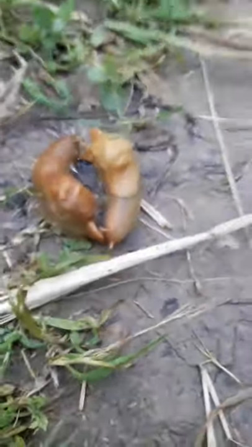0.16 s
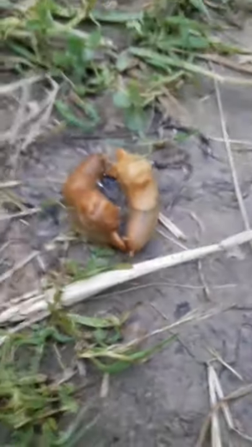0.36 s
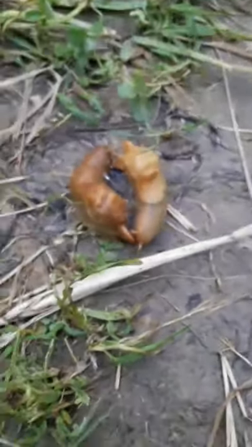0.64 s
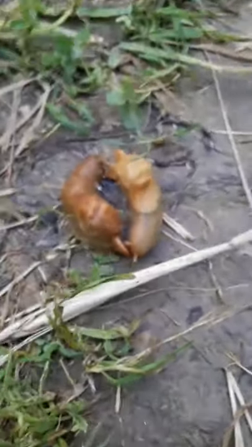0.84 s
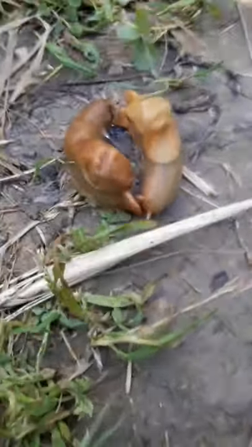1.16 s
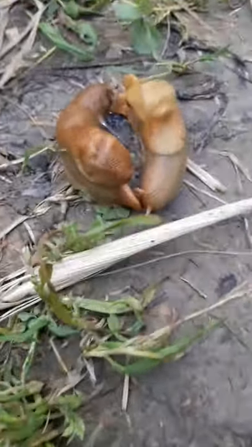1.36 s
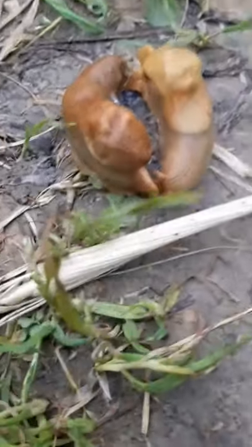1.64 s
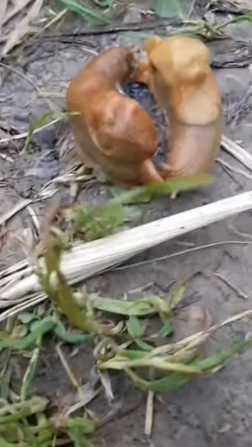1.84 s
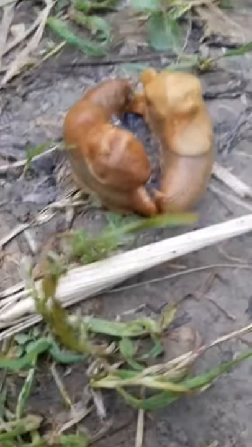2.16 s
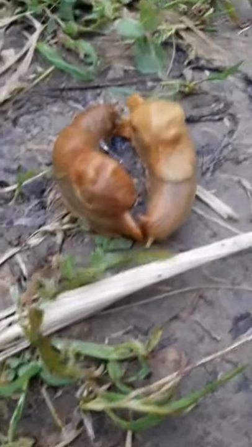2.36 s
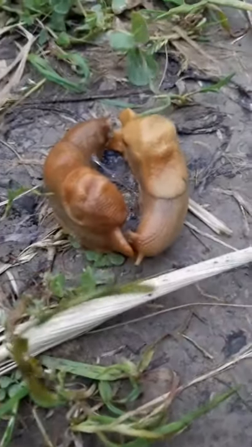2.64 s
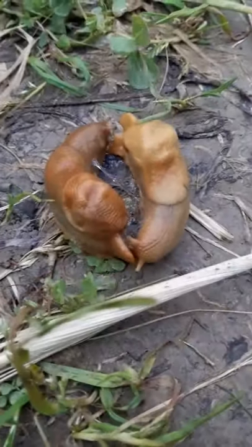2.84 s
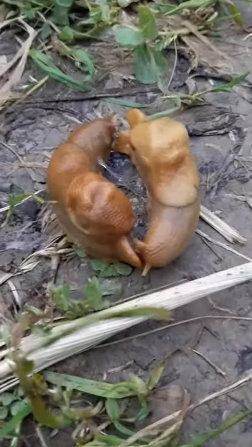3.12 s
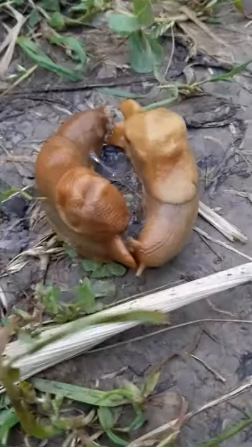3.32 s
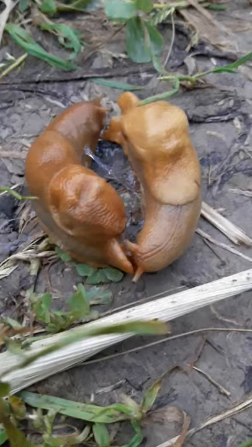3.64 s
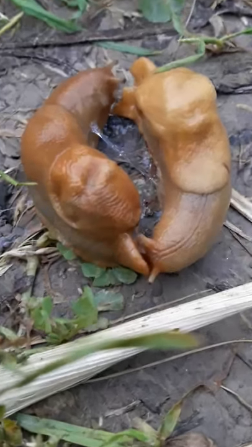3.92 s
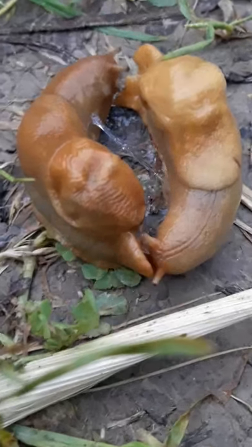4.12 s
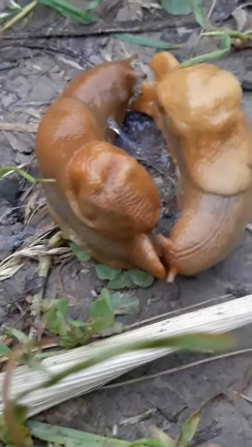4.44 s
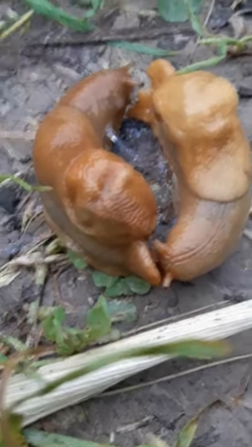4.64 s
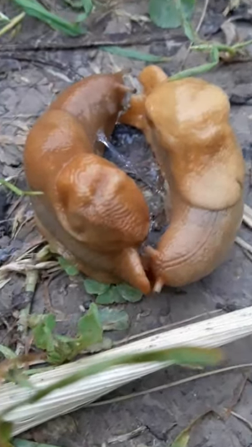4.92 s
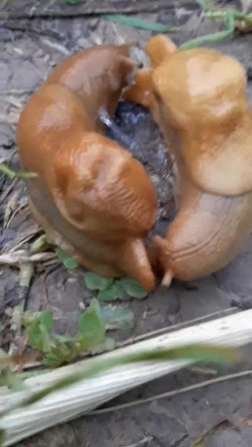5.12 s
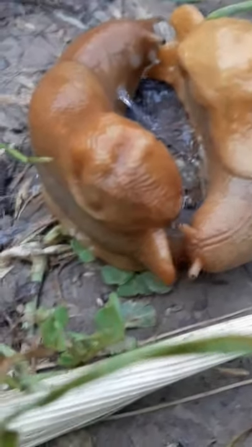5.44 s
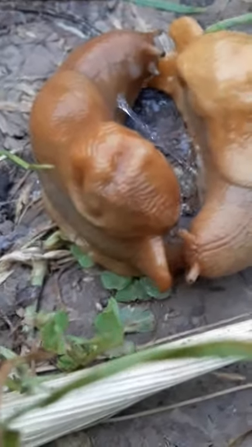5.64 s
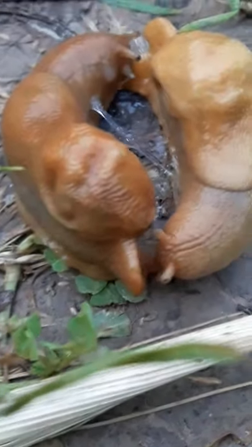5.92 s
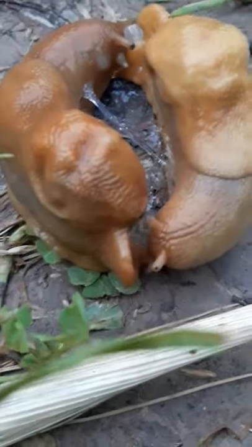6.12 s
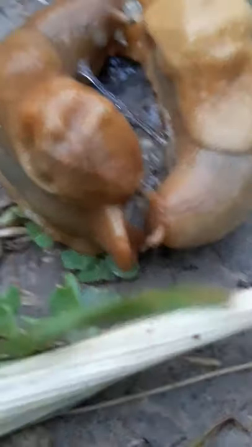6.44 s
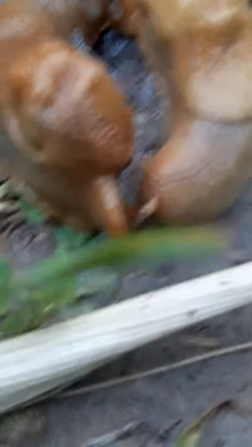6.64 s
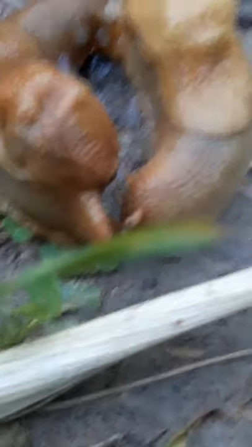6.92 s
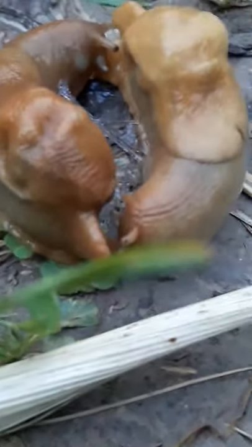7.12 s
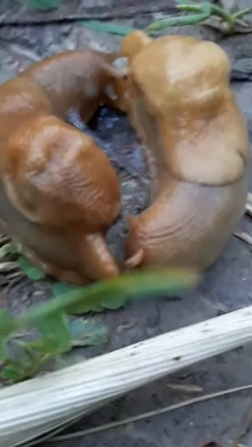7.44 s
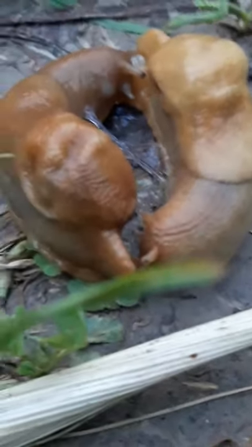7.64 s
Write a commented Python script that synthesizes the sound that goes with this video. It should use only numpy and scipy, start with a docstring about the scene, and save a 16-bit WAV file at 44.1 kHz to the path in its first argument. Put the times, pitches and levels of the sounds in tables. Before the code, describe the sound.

A dense flock of small birds chatters and whistles outdoors over the low wavering drone of two motors, with brief rustles near the microphone.

```python
"""A large flock of small birds chatters over two droning motors, with faint hiss and a few low far calls.
The flock is hundreds of short bent tones per tree plus a noise wash; the motors are wavering tones and rumble.
Whistles (slurs, chirps, peeps) stand out throughout as gliding tones; one dry tick, a windowed sine, snaps
near the start; rasps, tones of fast-shaken pitch, recur. Grainy noise bursts make rustles and dull shuffles.
From midway, thin calls plunge in pitch. Random decaying tails blur all the birds as foliage does."""
import sys
import numpy as np
from scipy import signal
from scipy.fft import rfft, irfft, next_fast_len
from scipy.io import wavfile
from scipy.ndimage import map_coordinates

SR = 44100
rng = np.random.default_rng(int(sys.argv[2]) if len(sys.argv) > 2 else 0)


def wav_out(sig):
    """Save sig, one row per channel (or a flat mono array), as 16-bit PCM at SR to the path in sys.argv[1]."""
    wavfile.write(sys.argv[1], SR, np.round(np.clip(np.atleast_2d(sig).T, -1, 1) * 32767).astype(np.int16))


N = 343098


def amp(db):
    """Amplitude factor of a level in dB."""
    return 10 ** (np.asarray(db) / 20)


def unit(x):
    """x scaled to rms 1."""
    return x / np.sqrt(np.mean(x ** 2) + 1e-20)


def along(points, hz):
    """Interpolate (frequency [Hz], value) points on a log frequency axis."""
    point_hz, values = np.transpose(points)
    return np.interp(np.log(hz + 1), np.log(point_hz + 1), values)


def curves(rows):
    """One value per sample for each column after the time."""
    time_s, *columns = np.transpose(rows)
    return [np.interp(np.arange(N) / SR, time_s, column) for column in columns]


def wobble(rate_hz, size):
    """Smooth random curve with rate_hz knots a second."""
    knots = rng.standard_normal(int(size * rate_hz / SR) + 4)
    return map_coordinates(knots, [np.arange(size) * rate_hz / SR])


def filtered(x, response):
    """x times a response of frequency."""
    m = next_fast_len(N + SR // 4)
    spectrum = rfft(x, m) * response(np.fft.rfftfreq(m, 1 / SR))
    return irfft(spectrum, m)[..., :N]


def noise(spectrum):
    """Noise of rms 1 with the given colour."""
    return unit(filtered(rng.standard_normal(N), lambda hz: amp(along(spectrum, hz))))


def add(track, start_s, sound):
    """Mix a sound into the track at start_s."""
    part = track[max(int(start_s * SR), 0):][:len(sound)]
    part += sound[:len(part)]


def swell(length_s):
    """Rounded rise and fall."""
    return np.sqrt(np.abs(np.sin(np.linspace(0, np.pi, max(int(length_s * SR), 16)))))


def note(length_s, start_hz, middle_hz, end_hz, rough, overtone_db=-37, warble=1):
    """Nearly pure tone bending through three pitches, times a warble, trembling by the share rough."""
    shape = swell(length_s)
    u = np.linspace(0, 1, len(shape))
    # parabola through the three pitches
    hz = start_hz * (1 - u) * (1 - 2 * u) + middle_hz * 4 * u * (1 - u) + end_hz * u * (2 * u - 1)
    knots = rng.standard_normal(len(shape) // 64 + 2)
    tremble = np.interp(u, np.linspace(0, 1, len(knots)), knots)
    phase = 2 * np.pi * np.cumsum(hz * warble * (1 + rough * tremble)) / SR
    return shape * (np.sin(phase) + amp(overtone_db) * np.sin(2 * phase))


def foliage(sound, wet_db, t60_s):
    """Leaves and trunks scatter a sound into a short decaying tail, drawn anew each time."""
    t = np.arange(SR // 3) / SR
    tail = rng.standard_normal(len(t)) * amp(-60 * t / t60_s)
    path = amp(wet_db) * tail / np.linalg.norm(tail)
    path[0] += 1  # direct sound
    return signal.fftconvolve(sound, path / np.linalg.norm(path))


def glides(rows, oct_per_s, bend_oct, steepens=0, reference_hz=2434):
    """Calls slide at the rate of their kind, so longer ones sweep farther; steepens is the power of pitch."""
    calls = []
    for start_s, length_s, hz, db in rows:
        half_oct = oct_per_s * (hz / reference_hz) ** steepens * length_s / 2
        start_hz = hz * 2 ** (bend_oct - half_oct)
        end_hz = hz * 2 ** (bend_oct + half_oct)
        calls.append((start_s, length_s, start_hz, hz, end_hz, db))
    return calls


def bird_calls(calls, gain_db, wet_db, t60_s, flutter_db, warble_share):
    """Single calls, each with an unsteady pitch and a flutter that breaks it into beads."""
    out = np.zeros(N)
    for start_s, length_s, start_hz, middle_hz, end_hz, db in calls:
        size = len(swell(length_s))
        warble = 1 + warble_share * wobble(110, size)
        tone = note(length_s, start_hz, middle_hz, end_hz, rough=.02, overtone_db=-33, warble=warble)
        flutter = unit(amp(flutter_db * np.tanh(wobble(141.6, size))))
        add(out, start_s, amp(db + gain_db) * foliage(tone * flutter, wet_db, t60_s))
    return out


def rubs(rows, spectrum, grain_db):
    """Short bursts of friction: coloured noise with a fast random grain."""
    force = np.zeros(N)
    for start_s, length_s, db in rows:
        add(force, start_s, amp(db) * swell(length_s))
    return force * unit(noise(spectrum) * amp(grain_db * wobble(157, N)))


def tree(count, spread_db=2, typical_s=.036, slide=0.0496, fall=0.018):
    """One tree full of birds: short hoarse notes at many pitches, a few more falling than rising."""
    out = np.zeros(N)
    places = rng.random((count, 2))
    shapes = rng.standard_normal((count, 4))
    for (when, pitch), (long, tilt, arch, loud) in zip(places, shapes):
        hz = 600 * (7600 / 600) ** (pitch ** .8)
        bend = np.exp(fall + slide * tilt)
        middle_hz = hz * np.exp(0.04046 * arch)
        chirp = note(typical_s * np.exp(.3 * long), hz * bend, middle_hz, hz / bend, rough=0.022)
        add(out, when * N / SR, amp(spread_db * min(loud, 1)) * chirp)
    return foliage(out, wet_db=1.5, t60_s=0.35)[:N]


def flock(trees=8, wash_db=-3, swell_db=.5, swell_rate_hz=7):
    """Trees of chirps over a noise wash of merged birds; three voice ranges follow the flock's loudness."""
    # flock loudness, used about its mean: (time [s], relative level [dB])
    loudness_rows = [(0.0, -46.5), (0.18, -54.5), (.9, -51), (1.22, -49.5), (1.32, -55), (1.5, -53),
                     (1.88, -52), (2.45, -56), (3.0, -54.5), (3.55, -51.5), (4.15, -47.5), (4.62, -48.5),
                     (5.37, -50), (6.02, -49.5), (6.62, -47), (6.92, -50.5), (7.09, -47), (7.78, -47.5)]
    # colour of the flock as a whole: (frequency [Hz], relative level [dB])
    chatter = [(240, -63), (400, -29.5), (533, -19.5), (728, -20.5), (874, -18.5), (1090, -17),
               (1910, -8.5), (2320, 1), (3130, -0.5), (3760, -2), (4340, -6.5), (5860, -6.5), (7030, -19),
               (8320, -36.5), (9000, -72), (11700, -74), (19800, -120)]
    chirps = sum(tree(count=380) for _ in range(trees))
    chirps = unit(filtered(chirps, lambda hz: amp(along(chatter, hz)) * (hz / 3000) ** 0.59))
    chorus = chirps + amp(wash_db) * noise(chatter)
    loudness_db, = curves(loudness_rows)
    surge_db = loudness_db - loudness_db.mean()

    def above(hz, edge_hz):
        return 1 / (1 + (edge_hz / (hz + 1)) ** 20)

    # (mean level [dB], share of the surge followed, band response)
    voices = [(-57, 0.43, lambda hz: 1 - above(hz, 2086)),
              (-51, 0.96, lambda hz: above(hz, 2138) - above(hz, 4337)),
              (-59, 0.74, lambda hz: above(hz, 4380))]
    out = np.zeros(N)
    for db, follows, band in voices:
        level_db = db + follows * surge_db + swell_db * wobble(swell_rate_hz, N)
        out += amp(level_db) * unit(filtered(chorus, band))
    return out


def drone(hz, db, waver_hz, fade_db):
    """One motor tone that wavers in pitch and fades a little at random."""
    phase = 2 * np.pi * np.cumsum(hz + waver_hz * wobble(25, N)) / SR
    return amp(db) * unit(np.sin(phase) * amp(fade_db * np.tanh(wobble(16, N))))


def engines(drone_db=-1, hum_db=-1, rumble_db=2, road_follows=0.12):
    """A deep motor, and a vehicle whose rising harmonics pass an exhaust resonance over dull road rumble."""
    # drone of the deep motor: (time [s], relative level [dB])
    motor = [(0, -70), (1.8, -68), (2.05, -63), (2.5, -68.5), (2.95, -67.5), (3.65, -62.5), (3.88, -70),
             (4.25, -60.5), (4.65, -61.5), (5.2, -67), (5.5, -62.5), (5.93, -67.5), (6.1, -61), (7.0, -62),
             (7.25, -69), (7.78, -63.5)]
    # vehicle: (time [s], firing rate [Hz], relative hum level [dB])
    traffic = [(0, 40, -80.5), (2.3, 41.52, -71.5), (2.85, 41.4, -66), (3.9, 46.35, -66.5),
               (4.6, 48.37, -66.5), (5.3, 52.42, -69), (7.78, 61.9, -73.5)]
    # colour of the road rumble before shaping: (frequency [Hz], relative level [dB])
    rumble = [(15, -39), (25, -11.5), (38, -14.5), (59, -7), (71, -11), (102, -3.5), (177, -11),
              (321, -12.5), (397, -21.5), (600, -39), (780, -37), (1320, -120)]
    exhaust_hz, exhaust_width_hz = 170, 19.8

    def boom(hz):
        return 1 / np.hypot(1, (hz - exhaust_hz) / exhaust_width_hz)

    firing_hz = 70.8 + .6 * np.arange(N) / SR  # slowly gains speed
    deep = drone(firing_hz, curves(motor)[0], waver_hz=2.7, fade_db=5.5)
    road_hz, road_db = curves(traffic)
    hum = sum(boom(k * road_hz) * drone(k * road_hz, road_db, waver_hz=3.2, fade_db=6)
              for k in range(2, 8))
    shaping = [(22, -24), (45, -1.5), (73, -20), (95, -4.0)]  # (frequency [Hz], gain [dB])
    dull = unit(filtered(noise(rumble), lambda hz: amp(along(shaping, hz))))
    mean_db = road_db.mean()
    dull_db = rumble_db + mean_db + road_follows * (road_db - mean_db)
    return amp(drone_db) * deep + amp(hum_db) * hum + amp(dull_db) * dull


def hiss(mid_db=-76.5, side_db=-81.0):
    """Faint coloured noise: one part common to both sides, one in opposite polarity."""
    # (frequency [Hz], relative level [dB])
    colour = [(300, 7.5), (1000, 2), (6000, -56), (8500, -7.5), (11200, -2), (12500, -2), (15300, 2)]
    return amp(mid_db) * noise(colour) + amp(side_db) * noise(colour) * np.array([[1], [-1]])


def low_calls():
    """Low calls from far off: drooping tones with deep flutter and a long scattered tail."""
    # (time [s], length [s], middle pitch [Hz], relative level [dB])
    rows = [(0, 0.16, 792, -57.5), (1.08, 0.14, 773, -62), (5.37, 0.11, 1507, -52),
            (7.1, 0.177, 910, -58.5), (7.3, 0.12, 890, -56)]
    calls = glides(rows, oct_per_s=-0.65, bend_oct=-0.0091)
    return bird_calls(calls, gain_db=-1.0, wet_db=0.0, t60_s=0.87, flutter_db=13.5, warble_share=0.0069)


def whistles():
    """Near whistles: slurs fall and flatten out, chirps rise and arch over, peeps sag slightly."""
    # falling slurs, the commonest: (time [s], length [s], middle pitch [Hz], relative level [dB])
    slurs = [(0.074, 0.091, 2250, -51.5), (0.39, 0.072, 2415, -51.5), (0.41, 0.056, 2020, -49),
             (0.841, 0.05, 1856, -47.5), (1.111, 0.025, 3490, -44.0), (1.449, 0.062, 2140, -48),
             (1.535, 0.052, 1747, -53.5), (1.943, 0.041, 2766, -42.5), (2.006, 0.033, 3280, -47),
             (2.089, 0.071, 2420, -49), (2.595, 0.08, 2450, -49), (3.204, 0.062, 2040, -52.5),
             (3.335, 0.05, 1810, -52), (3.385, 0.061, 2360, -47.5), (3.876, 0.053, 2347, -48.5),
             (3.904, 0.044, 3680, -44), (3.936, 0.062, 2880, -48), (4.01, 0.048, 2300, -52),
             (4.38, 0.057, 2280, -51), (4.692, 0.03, 3180, -46), (5.12, 0.087, 3480, -46),
             (5.215, 0.072, 2370, -44.5), (5.779, 0.031, 2890, -46.5), (6.285, 0.065, 2406, -44),
             (7.024, 0.033, 3740, -43.5), (7.304, 0.043, 2920, -40.5), (7.523, 0.046, 3060, -42)]
    # rising chirps: (time [s], length [s], middle pitch [Hz], relative level [dB])
    chirps = [(0.186, 0.076, 6290, -49), (0.254, 0.07, 3960, -53), (0.621, 0.059, 5660, -44.5),
              (0.986, 0.06, 5500, -48), (1.075, 0.046, 5930, -49.5), (1.069, 0.049, 4140, -50),
              (1.376, 0.04, 3780, -46), (1.674, 0.09, 2970, -50), (2.206, 0.05, 4080, -48.5),
              (3.307, 0.05, 3380, -51.5), (3.399, 0.07, 3480, -50), (3.591, 0.09, 3540, -47),
              (4.365, 0.09, 3550, -46), (5.39, .05, 3190, -53), (5.785, 0.045, 3230, -45),
              (7.05, .03, 3080, -45), (7.256, 0.045, 2976, -45.5), (7.416, 0.055, 3130, -44)]
    # nearly level peeps: (time [s], length [s], middle pitch [Hz], relative level [dB])
    peeps = [(0.33, 0.066, 2100, -54), (0.61, 0.029, 5460, -45), (0.622, 0.07, 2050, -49),
             (1.231, 0.037, 4080, -46), (1.425, 0.048, 3350, -41.5), (1.771, 0.073, 5640, -48),
             (2.735, 0.11, 2475, -50.5), (3.103, 0.057, 4010, -49.5), (3.994, 0.035, 2780, -48),
             (4.454, 0.072, 2700, -49), (4.85, 0.088, 3200, -45), (5.046, 0.075, 2294, -45.5),
             (5.471, 0.058, 2414, -53), (5.82, 0.058, 2310, -49), (6.36, 0.19, 2348, -49),
             (6.523, 0.075, 5900, -49), (6.56, .07, 2864, -44), (7.105, 0.058, 3160, -42)]
    calls = glides(slurs, oct_per_s=-5.0, bend_oct=0.0563, steepens=0.62)  # higher slurs fall faster
    calls += glides(chirps, oct_per_s=1.89, bend_oct=-0.0407)
    calls += glides(peeps, oct_per_s=-0.38, bend_oct=-0.022)
    return bird_calls(calls, gain_db=.8, wet_db=-6, t60_s=.16, flutter_db=5, warble_share=.014)


def tick(time_s=.0777, hz=5200, width_s=.00013, db=-27.5):
    """One tiny dry snap close to the microphone: a sine in a bell window a few cycles wide."""
    t = np.arange(N) / SR - time_s
    return amp(db) * np.exp(-.5 * (t / width_s) ** 2) * np.sin(2 * np.pi * hz * t)


def rasps(gain_db=-2):
    """Scolding birds: the pitch shakes so fast that the call turns to a rasp."""
    # (time [s], length [s], centre pitch [Hz], pitch shake [Hz], relative level [dB])
    rows = [(0.337, 0.057, 5700, 332, -46.5), (0.678, 0.032, 4870, 550, -46),
            (0.776, 0.043, 4600, 810, -45), (0.998, 0.2, 5590, 484, -50), (1.057, 0.028, 3210, 400, -41.5),
            (1.077, 0.16, 1990, 410, -47.5), (1.214, 0.029, 5710, 650, -41), (1.245, 0.023, 3440, 550, -40),
            (1.37, 0.032, 3420, 500, -44.5), (1.619, 0.043, 5830, 600, -47), (1.648, 0.044, 3700, 605, -43),
            (1.697, 0.065, 4140, 450, -45.5), (1.689, 0.092, 3020, 400, -42.5),
            (1.761, 0.083, 3360, 450, -40), (1.825, 0.035, 5150, 600, -48), (2.803, .045, 1900, 400, -48),
            (3.642, 0.073, 4810, 450, -48.5), (4.157, 0.076, 3320, 150, -44.5),
            (4.704, .07, 5560, 553, -49.5), (4.886, .04, 5100, 550, -48), (5.164, 0.079, 4860, 546, -45.5),
            (5.426, 0.15, 5500, 553, -48.5), (5.678, 0.054, 4950, 760, -44), (6.061, 0.16, 5570, 506, -45),
            (6.47, .016, 5440, 704, -39.5), (6.523, 0.24, 5440, 650, -47), (6.794, 0.075, 2886, 230, -36.5),
            (7.035, 0.027, 5310, 550, -43), (7.258, 0.046, 5440, 550, -47),
            (7.492, 0.045, 4760, 750, -43.5)]
    out = np.zeros(N)
    for start_s, length_s, centre_hz, shake_hz, db in rows:
        shape = swell(length_s)
        hz = centre_hz + shake_hz * np.tanh(wobble(1400, len(shape)))
        tone = shape * np.sin(2 * np.pi * np.cumsum(hz) / SR)
        add(out, start_s, amp(db + gain_db) * foliage(tone, wet_db=1, t60_s=0.17))
    return out


def rustles():
    """Handling rustles close to the microphone: broadband friction."""
    # (time [s], length [s], level [dB])
    handling = [(.55, 0.31, -57), (.78, .03, -57), (0.85, 0.085, -51.5), (1.49, 0.058, -57),
                (6.48, 0.32, -64)]
    # colour: (frequency [Hz], relative level [dB])
    scuff = [(100, -2), (400, -13), (900, -4.5), (3000, -2.5), (6000, 4), (8500, -22), (12000, -17.5),
             (15000, -17)]
    return rubs(handling, scuff, grain_db=2.0)


def shuffles():
    """Dull shuffles: friction with little treble."""
    # (time [s], length [s], level [dB])
    rows = [(.87, 0.072, -66), (6.52, 0.2, -65), (7.2, 0.11, -62.5), (7.54, 0.16, -62.5)]
    # (frequency [Hz], relative level [dB])
    colour = [(40, -12), (150, 0.5), (650, -6.5), (1500, -34), (4000, -57)]
    return rubs(rows, colour, grain_db=1.0)


def dives():
    """Thin calls that plunge: a steep, slightly arched drop."""
    # (time [s], length [s], middle pitch [Hz], relative level [dB])
    rows = [(3.708, 0.017, 3310, -42.5), (4.089, 0.022, 3220, -43.5), (4.327, 0.04, 3550, -44.5),
            (4.508, .022, 3310, -43), (4.737, 0.049, 3443, -44), (5.099, 0.036, 1890, -50),
            (5.53, 0.03, 2200, -48), (5.582, 0.04, 3540, -46), (5.68, 0.0233, 3760, -48),
            (6.312, .028, 3770, -46), (6.458, 0.025, 2244, -49), (6.68, 0.036, 1597, -52),
            (7.144, 0.029, 1620, -53)]
    calls = glides(rows, oct_per_s=-11, bend_oct=-0.022)
    return bird_calls(calls, gain_db=1.5, wet_db=-8, t60_s=.16, flutter_db=2, warble_share=.005)


def scene():
    """All sources are mono; only the faint hiss differs between the sides."""
    birds = flock() + low_calls() + whistles() + rasps() + dives()
    close = tick() + rustles() + shuffles()
    return birds + engines() + close + hiss()


def record(dry):
    """The microphone port rings in the high treble; nothing passes above the band limit."""
    ring_hz, width_hz, lift, top_hz = 11270, 450, 0.46, 15550

    def response(hz):
        port = 1 + lift / (1 + ((hz - ring_hz) / width_hz) ** 2)
        return port * (hz < top_hz)

    return filtered(dry, response)


dry = scene()
out = record(dry)
wav_out(out)
```